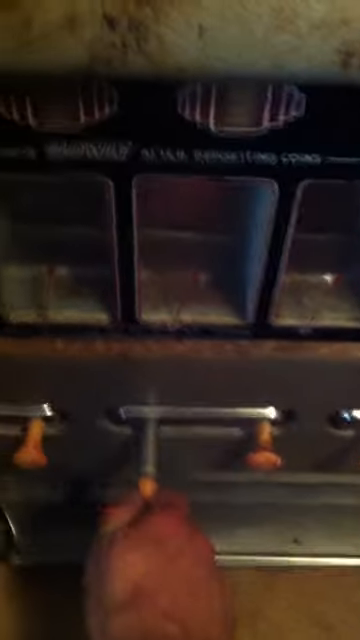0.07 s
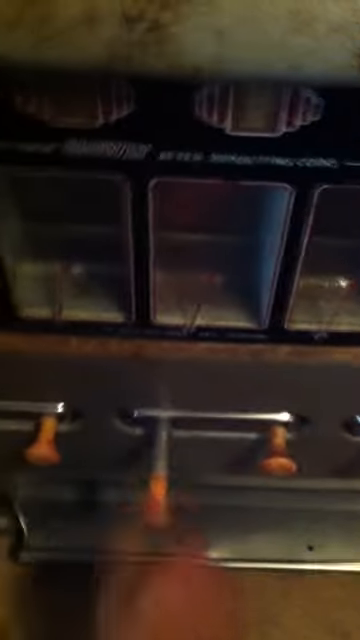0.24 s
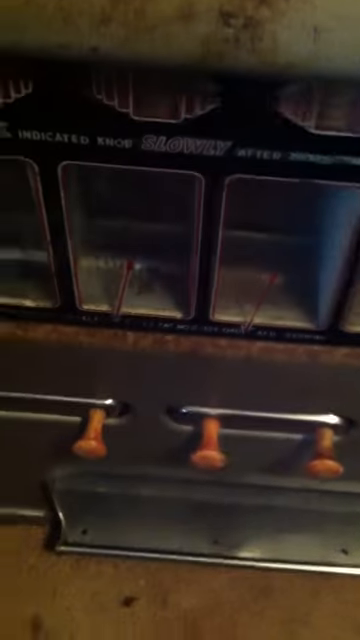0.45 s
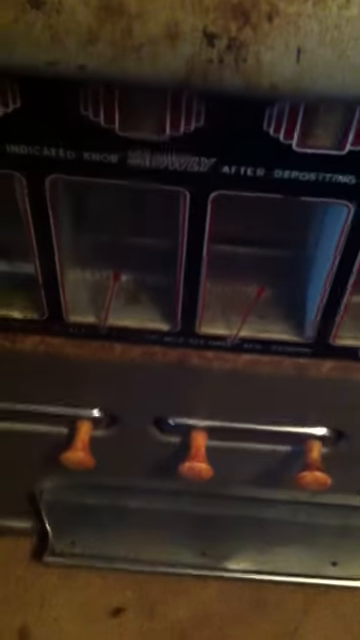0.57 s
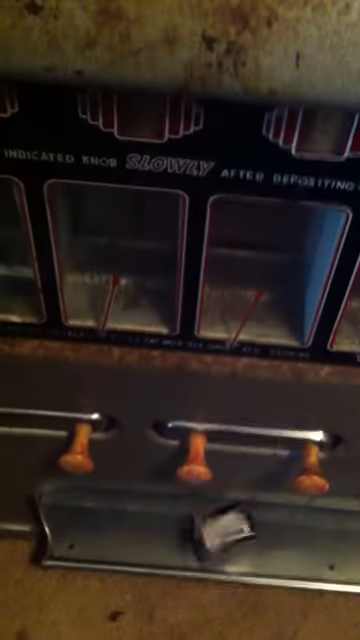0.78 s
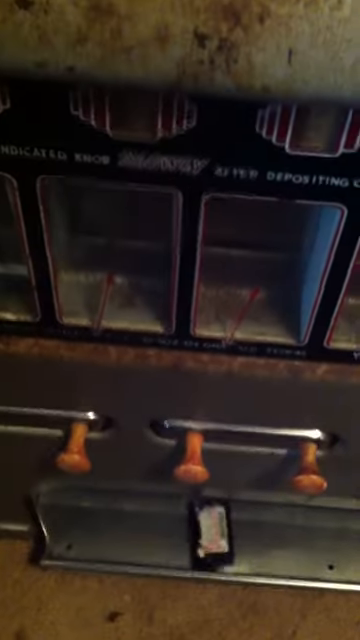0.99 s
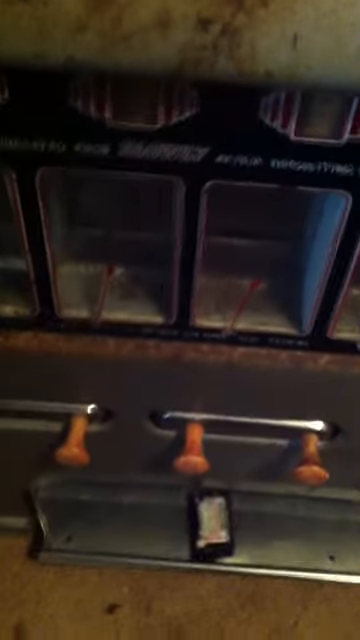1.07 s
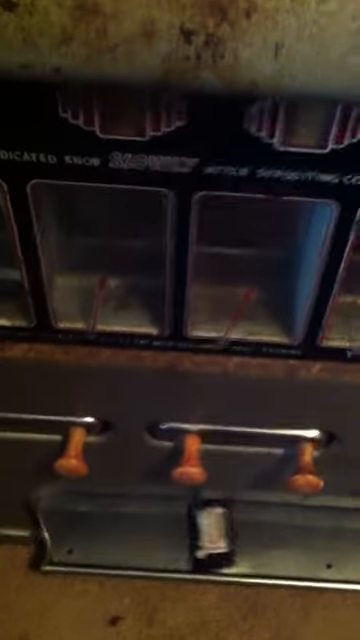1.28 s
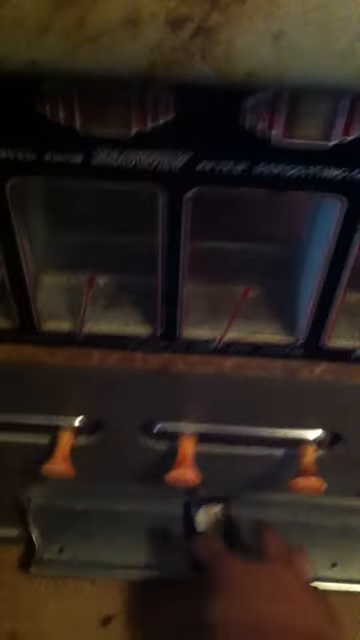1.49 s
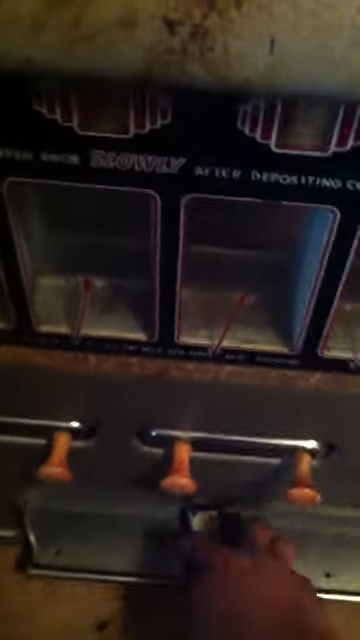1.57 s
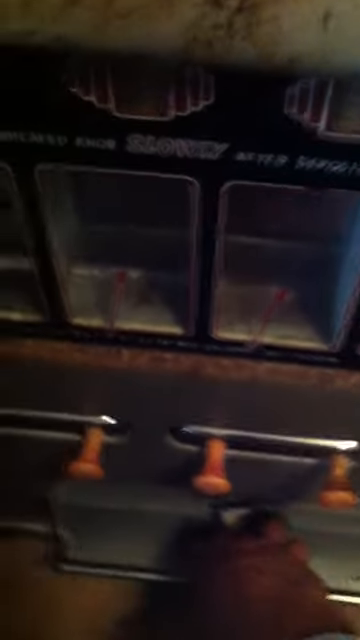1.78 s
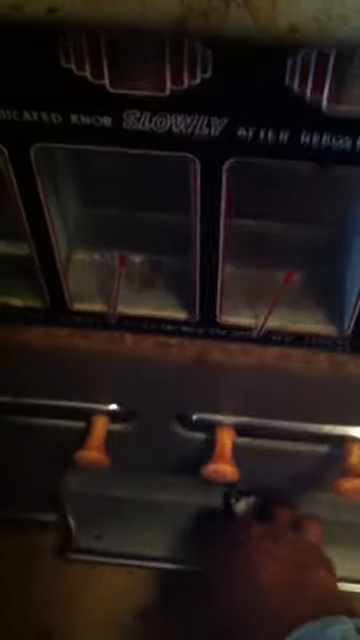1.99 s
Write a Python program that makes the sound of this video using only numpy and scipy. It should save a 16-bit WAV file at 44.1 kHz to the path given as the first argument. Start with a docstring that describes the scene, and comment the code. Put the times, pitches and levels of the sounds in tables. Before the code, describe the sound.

Metal clicks and clatter of a vending machine's pull knob, then a pack landing on steel.

```python
"""An old vending machine's steel pull knob is drawn out over its clicking ratchet and let go.
The rod slams home, and its springy linkage chatters until a catch drops shut. A small pack knocks
down the sheet-metal chute, lands in the steel tray and topples; a hand brushes its wrapper.
Each hit is a crack, a fading wash of noise and the ringing notes of the part that was struck.
It is all heard from close by, in a small room with a low hum."""
import sys
import numpy as np
from scipy import signal
from scipy.fft import rfft, irfft, next_fast_len
from scipy.io import wavfile
from scipy.ndimage import map_coordinates

SR = 44100
rng = np.random.default_rng(int(sys.argv[2]) if len(sys.argv) > 2 else 0)


def materialize(psi):
    """Save the field psi as 16-bit PCM at rate SR to the path in sys.argv[1].

    A 1-D psi becomes a single channel; in a 2-D psi each row is a channel.
    """
    bounded = np.clip(np.atleast_2d(psi).T, -1, 1)
    quanta = np.round(bounded * 32767).astype(np.int16)
    wavfile.write(sys.argv[1], SR, quanta)


N = 90404
TIME = np.arange(N) / SR


def amp(db):
    return 10 ** (np.asarray(db) / 20)


def along(points, hz):
    """Read between (pitch, value) points on a log pitch scale."""
    pitches, values = np.transpose(points)
    return np.interp(np.log(hz + 1), np.log(pitches + 1), values)


def wobble(rate):
    """A smooth curve through `rate` random values a second."""
    return map_coordinates(rng.standard_normal(int(N * rate / SR) + 4), [TIME * rate])


def noise(spectrum, size, extra_db=lambda hz: 0):
    """Noise of strength 1, coloured by spectrum and extra_db(hz)."""
    hz = np.fft.rfftfreq(size, 1 / SR)
    phases = np.exp(2j * np.pi * rng.random(len(hz)))
    x = irfft(amp(along(spectrum, hz) + extra_db(hz)) * phases, size)
    return x / np.sqrt(np.mean(x ** 2) + 1e-20)


def fade(x, decay, hold_s=0):
    """Hold, then let each pitch drop 60 dB over its own fade time."""
    hz, t, bands = signal.stft(x, SR, nperseg=128)
    fall_db = -60 * np.maximum(t - hold_s, 0) / along(decay, hz)[:, None]
    return signal.istft(bands * amp(fall_db), SR, nperseg=128)[1][:len(x)]


def hit_colour(hz, tilt_db, peak_hz, uneven_db):
    """Tilt makes a hit brighter or duller, and each spot struck favours other pitches (in dB)."""
    bumps = map_coordinates(rng.standard_normal(int(SR / 380)), [hz / 380])  # 380 Hz apart
    peak = sum(9.5 / (1 + (np.log2((hz + 1) / f) / 0.12) ** 2) for f in peak_hz)
    return tilt_db * np.log2(1 + hz / 500) + uneven_db * bumps * hz / (hz + 1500) + peak


def strikes(hits, notes, wash, decay, attack_s, hold_s, crack_db, crack_s, blur_hz, uneven_db=1.5):
    """Each hit cracks, leaves a wash (ringing so dense it is noise) and sounds the part's notes."""
    t, out = np.arange(SR) / SR, np.zeros(N + SR)
    for start, db, tilt_db, ring_db, *peak_hz in hits:
        dense = noise(wash, SR, lambda hz: hit_colour(hz, tilt_db, peak_hz, uneven_db))
        crack = 1 + amp(crack_db) * np.exp(-t / crack_s)
        dense = fade(dense, decay, hold_s) * crack
        # a random drift blurs each note slightly
        steps = rng.standard_normal((len(notes), SR)) * np.sqrt(2 * np.pi * blur_hz / SR)
        ring = 0
        for (hz, level, fade_s), drift in zip(notes, np.cumsum(steps, axis=1)):
            loudness = amp(level + rng.normal() - 60 * t / fade_s)
            ring += loudness * np.sin(2 * np.pi * (hz * t + rng.random()) + drift)
        onset = 1 - np.exp(-t / attack_s)
        out[round(start * SR):][:SR] += amp(db) * (dense + amp(ring_db) * ring) * onset
    return out[:N]


# the hum's notes, the air's colour and the drone's colour (pitch [Hz], level [dB])
HUM_NOTES = [(172, -64.5), (222, -71), (295, -64.5)]
AIR_COLOUR = [(35, -73.5), (60, -43.5), (175, -3.5), (298, -12), (559, -16), (953, -19.5), (1590, -27),
              (15500, -44)]
DRONE_COLOUR = [(70, -45.5), (115, 6.5), (185, 2.5), (260, -46.5)]
# loudness of the cabinet's drone (time [s], level [dB])
DRONE_LEVEL = [(0, -41), (.3, -57), (.55, -55), (1.1, -56), (1.7, -80)]


def background():
    """Soft air noise, a wavering hum and the cabinet's low drone, which dies away."""
    air = amp(-58.5) * noise(AIR_COLOUR, N)
    hum = 0
    for hz, db in HUM_NOTES:
        loudness = amp(db + 2.2 * wobble(13)) * np.sqrt(2)
        hum += loudness * np.sin(2 * np.pi * hz * TIME + 2.0 * wobble(9.1))
    drone = amp(np.interp(TIME, *np.transpose(DRONE_LEVEL))) * noise(DRONE_COLOUR, N)
    return air + hum + drone


# loudness of the rod's rubbing (time [s], level [dB])
SCRAPE_LEVEL = [(0, -31.5), (0.032, -40), (.1, -47.5), (0.202, -59), (.36, -61), (.42, -59), (0.501, -81)]
# its colour (pitch [Hz], level [dB])
SCRAPE_COLOUR = [(150, -35.5), (250, -3), (302, -1), (1200, -14.5), (2570, -17), (6310, -18.5),
                 (15500, -26)]


def rod_scrape():
    """The rod rubs unevenly as it slides."""
    level_db = np.interp(TIME, *np.transpose(SCRAPE_LEVEL))
    return amp(level_db + 2.1 * wobble(120)) * noise(SCRAPE_COLOUR, N)


# clicks (time [s], level [dB], tilt [dB per octave], ringing [dB], boosted pitch [Hz])
RATCHET_HITS = [(.042, -41.5, -1.5, -17.5, 6300), (.127, -38.5, 2.5, -24.5, 5600),
                (.162, -37.5, -2.5, -15, 1890), (.2225, -28.5, 0.5, 7, 2435), (.284, -40.5, -2, 6.5, 4500),
                (.325, -39.5, 1, -2.5, 7200), (.335, -38.5, -2, -15, 8000), (.374, -33, -2, 0, 3090),
                (.384, -37.5, 1.5, -11, 4400), (.398, -30, 0.5, -11, 7000)]
# the ratchet's notes (pitch [Hz], level [dB], fade time [s])
RATCHET_NOTES = [(1301, -18.5, 0.18), (1402, -15, 0.28), (2340, -10.5, 0.089), (2460, -2.5, 0.072),
                 (4457, -17, 0.25), (9040, -10.5, .07)]
# its wash (pitch [Hz], level [dB])
RATCHET_WASH = [(59, -47.5), (100, -15.5), (188, -1.5), (1040, -10.5), (1370, -8), (1760, -6), (2370, -5.5),
                (2690, -3.5), (4460, -2), (15500, -12)]
# how the wash dies (pitch [Hz], fade time [s])
RATCHET_FADE = [(200, 0.26), (1500, 0.1875), (5000, 0.078), (14000, 0.078)]


def ratchet():
    """The ratchet clicks from tooth to tooth as the knob is pulled."""
    return strikes(RATCHET_HITS, RATCHET_NOTES, RATCHET_WASH, RATCHET_FADE, attack_s=0.002,
                   hold_s=0.0054, crack_db=-4, crack_s=0.0032, blur_hz=10, uneven_db=4)


# the rod's hits (time [s], level [dB], tilt [dB per octave], ringing [dB])
ROD_HITS = [(.412, -22.5, 0.5, -8.5), (.4215, -24, 1, -8), (.4335, -16.5, 1, -2.5), (.4475, -29, -5.5, -4),
            (.465, -29, 3, -10)]
# its notes (pitch [Hz], level [dB], fade time [s])
ROD_NOTES = [(170.8, -17.5, 0.44), (293, -6.5, .22), (2100, -15.5, .2), (2380, -15, 0.19),
             (3180, -13.5, .18), (3940, -9.5, .18), (5930, -10, .2), (6457, -10, 0.089), (6872, -11, .14)]
# its wash (pitch [Hz], level [dB])
ROD_WASH = [(53, -44.5), (90, -14), (288, -9.5), (600, -10.5), (1420, -12.5), (2140, -8.5), (4260, -10),
            (6690, -9), (15500, -16.5)]
# how the wash dies (pitch [Hz], fade time [s])
ROD_FADE = [(200, 0.48), (1500, 0.3), (5000, .18), (14000, 0.29)]


def rod_slam():
    """Once let go, the rod slams home in a quick run of hits."""
    return strikes(ROD_HITS, ROD_NOTES, ROD_WASH, ROD_FADE, attack_s=0.002,
                   hold_s=0.005, crack_db=1, crack_s=0.007, blur_hz=3.7, uneven_db=3)


def overtones(count):
    """The linkage's weak high notes, picked at random (pitch [Hz], level [dB], fade time [s])."""
    return [(hz, -22, 0.19) for hz in rng.uniform(6500, 15500, count)]


# the linkage's hits (time [s], level [dB], tilt [dB per octave], ringing [dB])
LINK_HITS = [(.519, -24.5, -2.5, -3), (.526, -22, 0.5, 3.5), (.554, -25.5, 2.8, -2)]
# its notes (pitch [Hz], level [dB], fade time [s])
LINK_NOTES = [(6086, -5.5, 0.17), (6265, -6, .24), (7200, -17, 0.16), (9179, -8.5, 0.15),
              (11150, -14.5, 0.34), (11460, -17, .14), (13371, -21, .18)]
# its wash (pitch [Hz], level [dB])
LINK_WASH = [(65, -37), (110, -11.5), (291, -8), (499, -14.5), (909, -14.5), (1730, -20), (2170, -8),
             (2960, -14.5), (6360, -6), (15500, -6.5)]
# how the wash dies (pitch [Hz], fade time [s])
LINK_FADE = [(200, 0.42), (14000, 0.13)]


def linkage():
    """The springy levers joined to the rod chatter brightly."""
    return strikes(LINK_HITS, LINK_NOTES + overtones(36), LINK_WASH, LINK_FADE, attack_s=0.0011,
                   hold_s=0.015, crack_db=-17, crack_s=0.0021, blur_hz=3.84, uneven_db=4.5)


# the catch's hits (time [s], level [dB], tilt [dB per octave], ringing [dB])
CATCH_HITS = [(.6035, -21, 2, -0.5), (.642, -20.5, -0.4, -10.5)]
# its notes (pitch [Hz], level [dB], fade time [s])
CATCH_NOTES = [(6420, -1, .16), (6800, -2, 0.12), (6810, -3, .14), (7405, -6.5, 0.096), (8150, -10.5, .15),
               (13050, -8, .18)]


def catch():
    """The catch drops shut and rings the linkage too."""
    return strikes(CATCH_HITS, CATCH_NOTES + overtones(24), LINK_WASH, LINK_FADE, attack_s=0.0017,
                   hold_s=0.019, crack_db=-14, crack_s=0.0023, blur_hz=5, uneven_db=4.5)


# knocks on the chute (time [s], level [dB], tilt [dB per octave], ringing [dB])
CHUTE_HITS = [(.681, -17.5, -0.34, -1), (.698, -16.5, 2, 1.5), (.738, -26.5, -5.5, -5.5),
              (.781, -41, -5.5, -29)]
# its notes (pitch [Hz], level [dB], fade time [s])
CHUTE_NOTES = [(242, -11, .19), (283, -1, .14), (538, -14, .22), (670, -11, .17), (834, -10, .17),
               (915, -8, .14), (1010, -14, .2), (1180, -16, .17), (1280, -16, .19), (2250, -12, .16),
               (2520, -11, .15)]
# its wash (pitch [Hz], level [dB])
CHUTE_WASH = [(60, -50), (152, -33), (287, 2), (477, -18), (845, -8), (1080, -15), (1310, -9),
              (1670, -19.5), (2490, -12), (2720, -18.5), (4130, -22.5), (15500, -32)]
# how the wash dies (pitch [Hz], fade time [s])
CHUTE_FADE = [(200, 0.15), (1500, 0.15), (5000, 0.14), (14000, 0.071)]


def chute():
    """The falling pack thumps against sheet metal."""
    return strikes(CHUTE_HITS, CHUTE_NOTES, CHUTE_WASH, CHUTE_FADE, attack_s=0.0014,
                   hold_s=0.011, crack_db=-9, crack_s=0.0045, blur_hz=3.2)


# hits on the tray (time [s], level [dB], tilt [dB per octave], ringing [dB])
TRAY_HITS = [(.838, -23.5, 6, 7), (.8565, -20, -0.5, 1.5), (.893, -27, 1, 2.5), (.969, -42.5, 9, -16),
             (.993, -42, 5, 11.5), (1.029, -37.5, -6, -13), (1.04, -36.5, -7, 8.5), (1.075, -40.5, -9, -1)]
# its notes (pitch [Hz], level [dB], fade time [s])
TRAY_NOTES = [(200, -21, .6), (277, -17, .42), (310, -11, .34), (469, -21, .6), (696, -19, .55),
              (758, -17, .36), (845, -21, .42), (1141, -20, .42), (1224, -20, .38), (1335, -19, .56),
              (1965, -19, .28), (2464, -18, .23)]
# its wash (pitch [Hz], level [dB])
TRAY_WASH = [(47, -53.5), (130, -30), (269, -7), (294, 1), (427, -16.5), (532, -4.5), (594, -16), (741, -4),
             (965, -7), (1330, -5.5), (2040, -4), (3460, -17), (4410, -15), (15500, -30.5)]
# how the wash dies (pitch [Hz], fade time [s])
TRAY_FADE = [(200, 0.27), (1500, 0.19), (5000, 0.19), (14000, 0.15)]


def tray():
    """The pack lands, slips and topples, ringing the steel tray."""
    return strikes(TRAY_HITS, TRAY_NOTES, TRAY_WASH, TRAY_FADE, attack_s=0.0011,
                   hold_s=0.0051, crack_db=-8.5, crack_s=0.0034, blur_hz=5.4)


# finger rubs (time [s], level [dB], pitch [Hz], length [s])
SCUFFS = [(1.58, -65, 2850, 0.033), (1.73, -72, 4200, .016)]


def scuffs():
    """Fingertips rub the wrapper in faint swishes."""
    out = np.zeros(N + SR)
    for start, db, hz, length_s in SCUFFS:
        size = int(length_s * SR)
        swish = noise([(hz / 2, -30), (hz, 0), (hz * 2, -36)], size)
        out[round(start * SR):][:size] += amp(db) * np.hanning(size) * swish
    return out[:N]


# the hand's bumps (time [s], level [dB], tilt [dB per octave], ringing [dB])
HAND_HITS = [(1.778, -68.5, 3, -12), (2.005, -57, -0.5, -9)]


def hand_bumps():
    """The reaching hand softly bumps the tray."""
    return strikes(HAND_HITS, TRAY_NOTES, TRAY_WASH, TRAY_FADE, attack_s=0.0049,
                   hold_s=0.0051, crack_db=-19, crack_s=0.003, blur_hz=1.6)


def squeak(start_s=1.78, length_s=0.058, pitch_hz=3880, level_db=-72):
    """A fingertip sticks and slips on the wrapper in one thin, wavering note."""
    size, out = int(length_s * SR), np.zeros(N)
    hz = pitch_hz * (1 + 0.01 * wobble(150)[:size])
    note = np.sin(2 * np.pi * np.cumsum(hz) / SR)
    out[round(start_s * SR):][:size] = amp(level_db) * np.hanning(size) * note
    return out


# how the room's echo dies (pitch [Hz], fade time [s])
ECHO_FADE = [(150, 0.69), (1200, 0.44), (4000, 0.27), (14000, 0.27)]


def room_echo(x):
    """The walls answer with a short, smooth echo."""
    tail = fade(rng.standard_normal(SR), ECHO_FADE)
    return signal.fftconvolve(x, tail / np.linalg.norm(tail))[:N]


def scene():
    """The machine in its room."""
    knob = rod_scrape() + ratchet() + rod_slam() + linkage() + catch()
    pack = chute() + tray()
    hand = scuffs() + hand_bumps() + squeak()
    direct = knob + pack + hand
    return (direct + amp(-16.5) * room_echo(direct) + background())[None]


def record(dry):
    """The microphone thins the deep bass and cuts off the highest treble."""
    bass_hz, top_hz, edge_hz = 92, 15950, 400
    bass_cut = signal.butter(4, bass_hz, "highpass", fs=SR, output="sos")
    thin = signal.sosfilt(bass_cut, dry) + amp(-14.5) * dry
    size = next_fast_len(N + SR // 2)
    passed = np.clip((top_hz - np.fft.rfftfreq(size, 1 / SR)) / edge_hz, 0, 1)
    return irfft(rfft(thin, size) * passed ** 2, size)[:, :N]


dry = scene()
out = record(dry)
materialize(out)
```